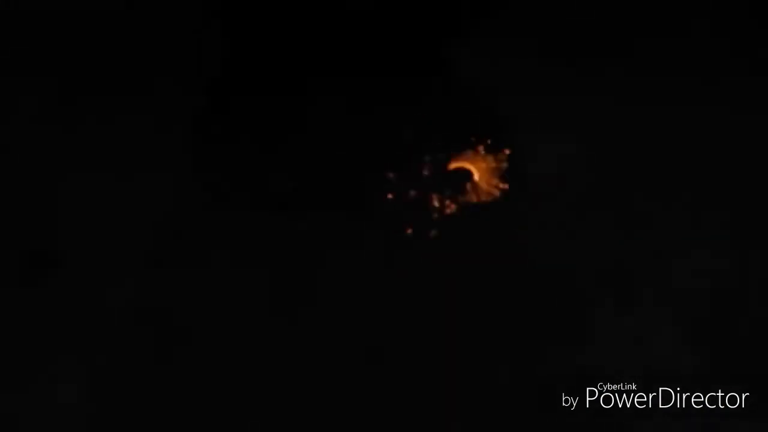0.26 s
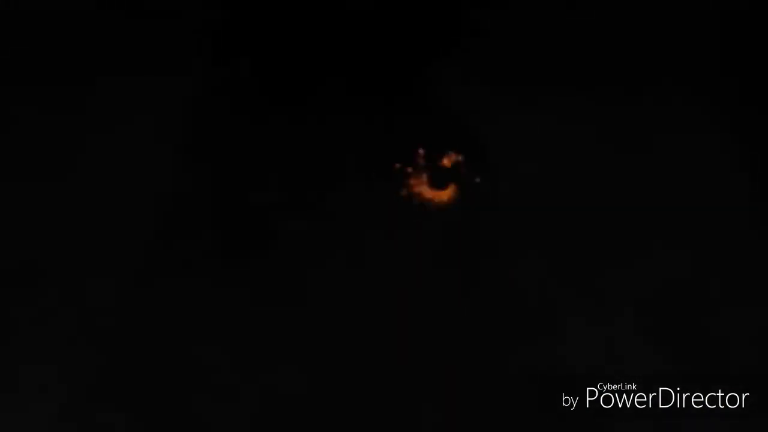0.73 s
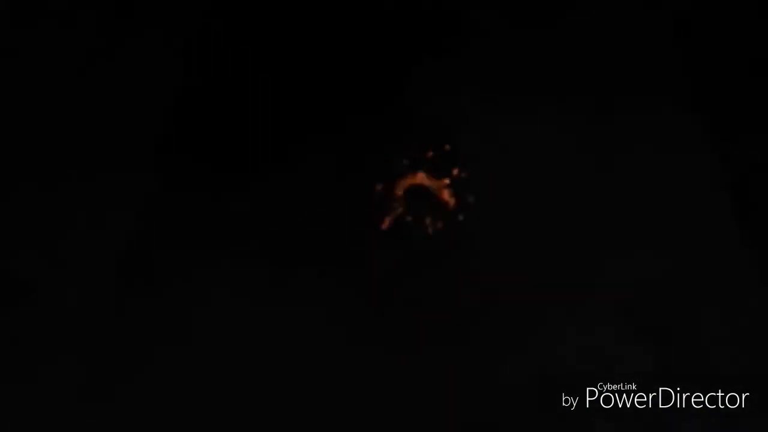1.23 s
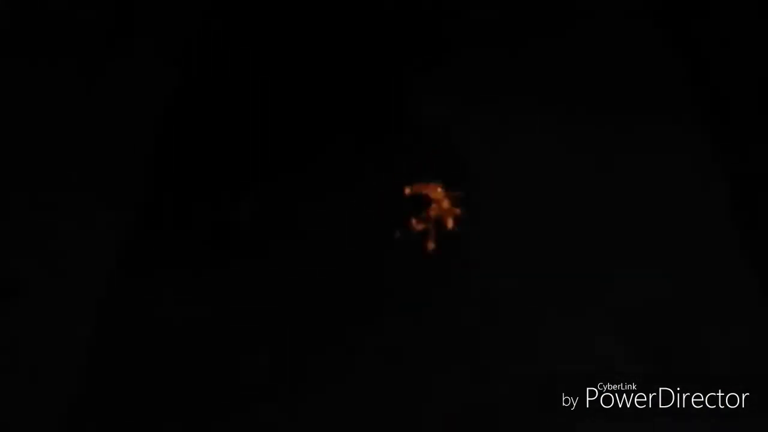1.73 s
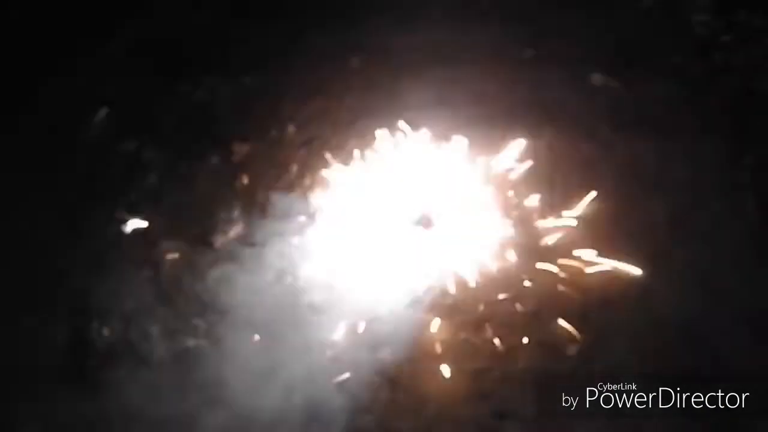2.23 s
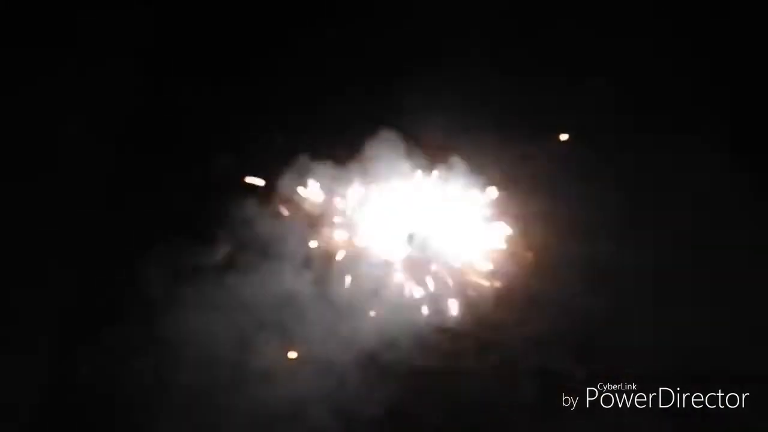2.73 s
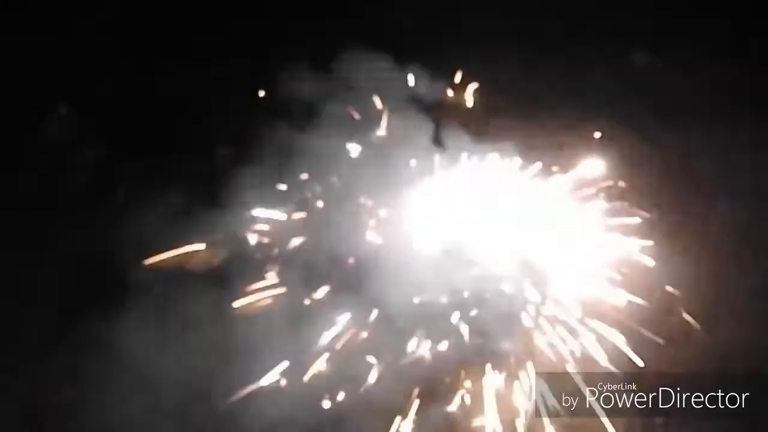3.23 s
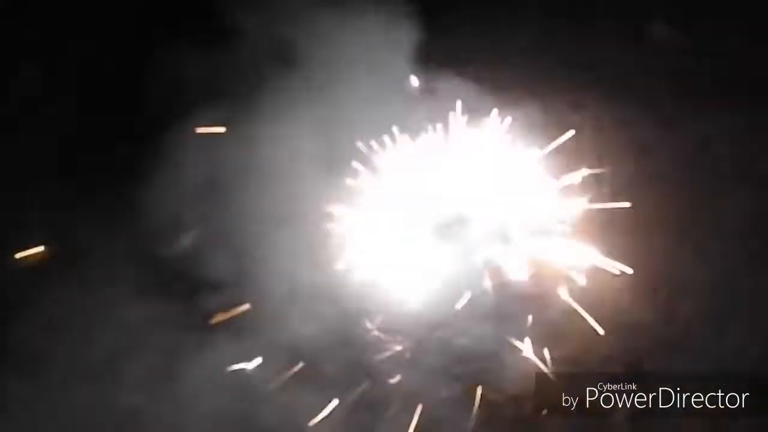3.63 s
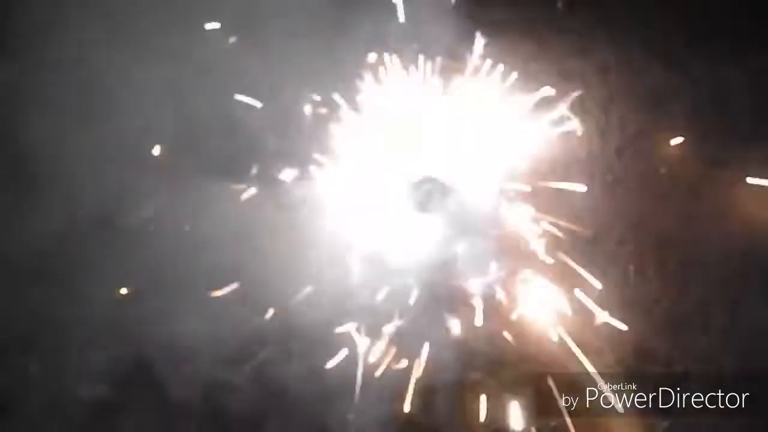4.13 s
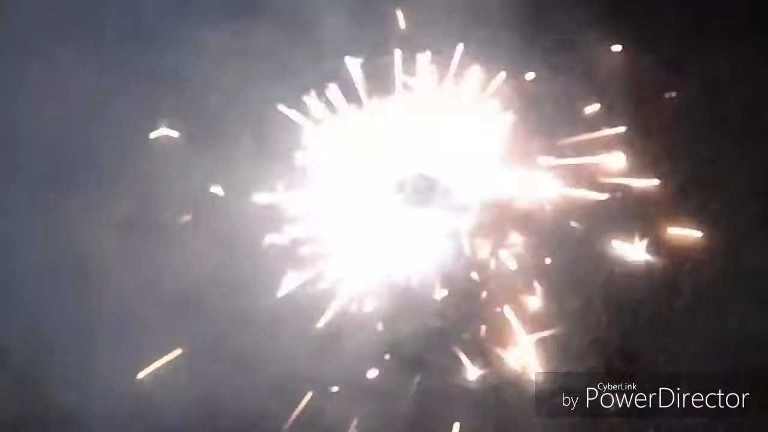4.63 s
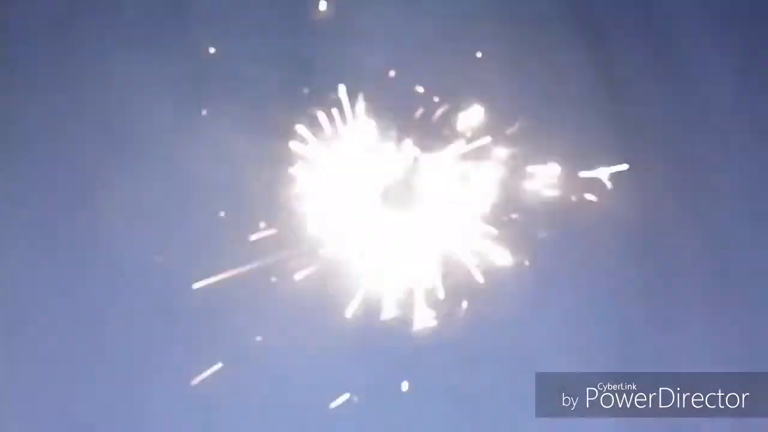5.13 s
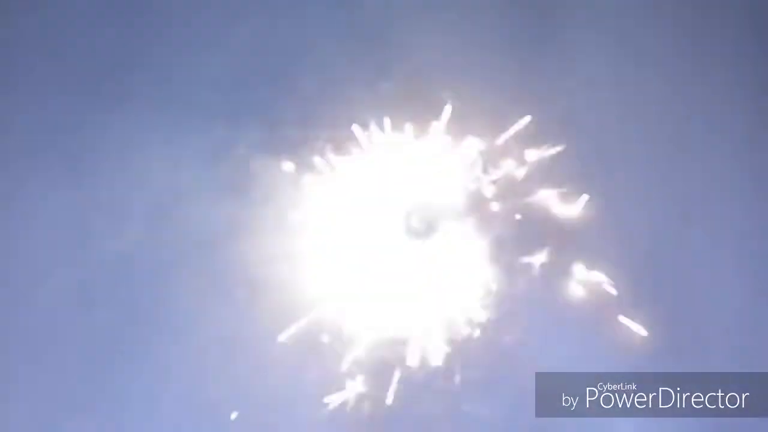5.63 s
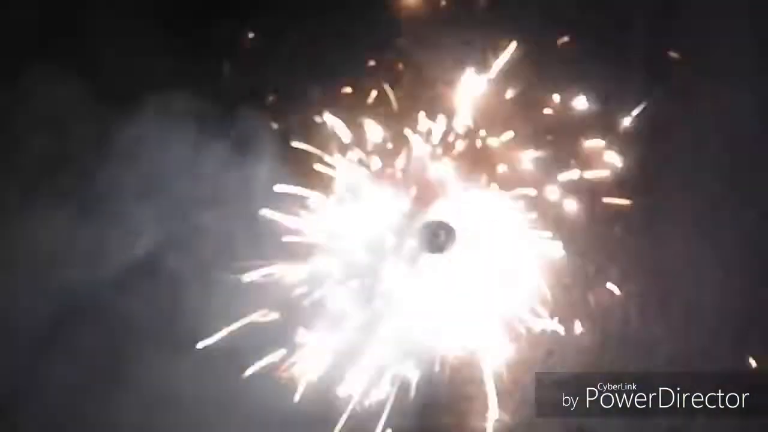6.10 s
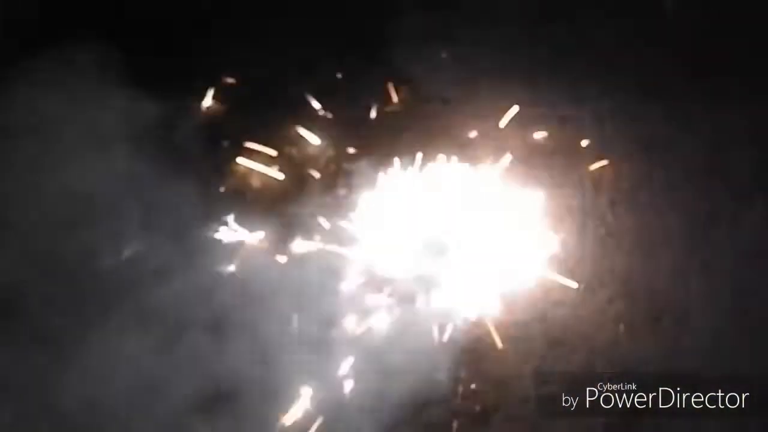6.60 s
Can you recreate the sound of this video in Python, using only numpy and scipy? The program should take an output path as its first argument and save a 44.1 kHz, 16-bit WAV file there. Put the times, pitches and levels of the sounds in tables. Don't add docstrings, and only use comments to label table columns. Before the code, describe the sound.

Outdoors at night, a small ground spinner fizzes quietly with tiny ticks, then bursts into a strong, throbbing, crackly hiss that keeps burning to the end.

```python
import sys
import numpy as np
from scipy import signal
from scipy.fft import rfft, irfft
from scipy.io import wavfile
from scipy.ndimage import uniform_filter1d

SR = 44100
rng = np.random.default_rng(int(sys.argv[2]) if len(sys.argv) > 2 else 0)


def master(y):
    cut = np.clip(np.atleast_2d(y).T, -1, 1)
    pcm = np.round(cut * 32767)
    wavfile.write(sys.argv[1], SR, pcm.astype(np.int16))


def attenuation_scalar(level_db):
    decades = np.asarray(level_db, float) / 20
    return 10 ** decades


N = 302393

# [f/Hz, density/dB per Hz]
NIGHT_COLOUR = [(12, -30), (20, -7), (33, -18), (60, -19), (203, -1), (400, -25), (520, -48), (880, -120)]
# [f/Hz, density/dB per Hz]
SIDE_COLOUR = [(25, 2), (200, 5.5), (800, -7), (2000, -21), (6000, -19), (10000, -7), (15500, -6.5)]
# [f/Hz, width/Hz, lift/dB]
YARD_BANDS = [(496, 85, 3.5), (756, 105, 2.5), (1110, 45, 0), (1590, 26, 1), (1910, 31, 3), (13900, 760, 4)]
# [t/s, then f/Hz of the four lowest notches]
HAND_NOTCHES = [(0, 2950, 6400, 10100, 13700), (1.66, 2950, 6450, 10150, 13800),
                (1.74, 2800, 6100, 9400, 12650), (3.1, 2760, 6000, 9300, 12500),
                (3.45, 2690, 5830, 9050, 12200), (3.9, 2730, 5900, 9250, 12400),
                (5.6, 2770, 6000, 9400, 12600), (5.74, 2800, 5800, 9400, 12400),
                (5.76, 2880, 5700, 9400, 10500), (5.84, 3080, 5500, 9800, 12600),
                (5.95, 3300, 5750, 10300, 13500), (6.04, 3250, 5700, 9700, 13300),
                (6.17, 3050, 5350, 8450, 11500), (6.33, 2620, 5020, 7250, 9700),
                (6.45, 2560, 4950, 7050, 9250), (6.65, 2600, 5000, 7050, 9200),
                (6.86, 2600, 5050, 7300, 9400)]
ECHO_STRENGTH = [(.66, .55, .45, .16, .2), (.82, .68, .55, .15, .22), (.62, .2, .38, .45, .2),
                 (.72, .18, .8, .5, .4), (.8, .28, .45, .4, .45)]
# [start t/s, end t/s]
FLARE_TIMES = (1.7, 3.0)
SWING_TIMES = (5.72, 5.86)
BACK_TIMES = (6.03, 6.12)
SETTLE_TIMES = (6.32, 6.42)
# [t/s, peak level/dB, f/Hz, ring/cycles, first swing up or down/+-1]
SPARK_BURSTS = [(.4180, -41, 1470, 5, 1), (.6140, -40, 2000, 2.8, 1), (.7689, -31, 2200, 3.6, 1),
                (.7690, -39, 5800, 6, 1), (.8016, -31, 1050, 1.9, -1), (.8016, -43, 400, 2.2, -1),
                (.8194, -40, 8400, 4, 1), (.8195, -36, 4500, 3.6, 1), (1.9530, -45, 5300, 2.6, 1),
                (6.0268, -22, 2400, 3.4, 1), (6.0268, -30, 600, 1.8, 1), (6.0268, -50, 75, 1.6, 1),
                (6.0269, -30, 14000, 8, 1), (6.02693, -9, 4300, 2.4, 1)]
# [t/s, turns done, hiss swing per turn/dB]
SPIN_COURSE = [(0, .51, .9), (.4, 5.77, 1.6), (1.0, 14.44, .9), (1.6, 22.02, .7), (2.0, 26.46, 3.0),
               (2.39, 30.55, .9), (2.59, 32.61, .9), (2.79, 34.5, 2.4), (2.99, 36.55, 2.2),
               (3.59, 43.89, 1.9), (4.39, 55.0, 1.5), (4.99, 63.54, 1.0), (5.19, 66.57, 1.0),
               (5.39, 69.42, 2.3), (6.19, 80.01, .8), (6.39, 82.99, .2), (6.59, 85.74, .5),
               (6.86, 90.2, .9)]
# [f/Hz, swing once a turn/dB, swing twice a turn/dB]
JET_LOBES = [(2600, .2, .2), (3300, .4, .3), (3950, 1.3, .3), (4650, 3.6, .8), (5350, 3.8, 1.7),
             (6050, 1.2, 2.2), (6750, .3, 2), (7500, 0, 1.1), (9000, 0, .9), (10300, 0, 1.1),
             (12000, 0, .6)]
# [f/Hz, density/dB per Hz]
JET_COLOUR = [(25, -24), (50, -25.5), (100, -8), (290, -7), (430, -4), (620, -7.5), (900, -4.5), (1800, 0),
              (2700, 4.5), (4000, 4), (6000, -7.5), (8000, -11.5), (10500, -14.5), (15500, -18.5)]
REGION_BORDERS = [140, 2800, 6000, 9300]
# [offset/dB, share of treble change, share of puffs]
REGION_FOLLOW = [
    (-31.5, -0.94, .2),
    (-5, -0.44, 0.81),
    (-7, -0.31, 0.92),
    (-12, 1.15, 1.62),
    (-16.5, 0.78, 0.69),
]
# [t/s, level/dB, treble share/dB, nozzle whistle over roar/dB]
SMOULDER_BURN = [
    (0, -54, -13, 0),
    (.25, -55.5, -11, -1.5),
    (.74, -53, -9.5, 3.5),
    (.82, -55.5, -12, -2),
    (.88, -63, -9, -0.5),
    (1.53, -58.5, -8.5, 2),
    (1.6, -65.5, -7, 2),
    (1.93, -60, -7.5, 1.5),
    (2.08, -60, -10, 3.5),
]
# [t/s, level/dB, treble share/dB, nozzle whistle over roar/dB]
FLARE_BURN = [(2.14, -57, -9, 4), (2.19, -51, -7, 0.5), (2.25, -42, -9, 1.5), (2.48, -35, -9.5, -4),
              (2.54, -40, -8, 1.5), (2.9, -40.5, -9, -0.5), (3.15, -40, -9, -3), (3.55, -38, -8, -2),
              (4.07, -36.5, -8.5, 2), (4.4, -36.5, -8.5, -1), (4.95, -38, -7.5, 1.5), (5.3, -38, -7.5, 0),
              (5.7, -36, -8.5, 0.5), (5.95, -35, -6, 2.5), (6.2, -37, -6, 2), (6.45, -35, -4, -1.5),
              (6.62, -38, -4, -3), (6.86, -38, -5, -3)]
# [t/s, extra level/dB, length/s]
GAS_PUFFS = [(0.08, 1.5, 0.074), (0.406, 3, 0.043), (0.526, 2.5, 0.054), (0.612, 1.5, 0.058),
             (.78, 4, 0.042), (0.962, -4, 0.039), (1.028, 3, 0.056), (1.19, -3.5, 0.042), (1.257, 1, .04),
             (1.65, 3, 0.04), (1.853, 2, 0.021), (1.935, 3, 0.022), (2.128, 2, 0.02), (3.42, 1.5, 0.017),
             (4.048, 1.5, 0.092), (4.23, -2.5, 0.02), (4.568, 4, 0.019), (4.602, 3, 0.064),
             (4.724, 4, 0.0073), (5.298, -1, 0.085), (5.425, 2.5, 0.056), (5.567, 2, 0.018),
             (5.695, 0.5, 0.047), (6.034, 2.5, 0.051), (6.093, 4.5, 0.034), (6.203, 4.5, 0.014),
             (6.348, 2, 0.037), (6.82, 1.5, 0.021)]
# [t/s, extra level/dB, length/s]
FINE_SPITS = [(.02, 4, .04), (.29, 4, .07), (.38, 4, .04), (.45, 4, .03), (.54, -1, .03), (1.64, 4, .05),
              (2.62, 5, .03), (5.1, 6, .02)]


def rms_one(x):
    return x / np.sqrt(np.mean(x ** 2) + 1e-20)


def in_time(rows):
    s, *columns = np.transpose(rows)
    return [np.interp(np.arange(N) / SR, s, c) for c in columns]


def drift(rate):
    r = np.exp(-80 * np.pi * rate / SR)
    slow = signal.lfilter([1], [1, -2 * r, r * r], rng.standard_normal(N // 40 + 2002))[2000:]
    return np.interp(np.arange(N) / 40, np.arange(len(slow)), rms_one(slow))


def coloured(x, points):
    hz = np.maximum(np.arange(N // 2 + 1) * SR / N, 1)
    point_hz, point_db = np.transpose(points)
    return rfft(x) * attenuation_scalar(np.interp(np.log(hz), np.log(point_hz), point_db)), hz


def coloured_noise(points):
    return rms_one(irfft(coloured(rng.standard_normal(N), points)[0], N))


def night_rumble():
    return attenuation_scalar(-86.5 + 2.0 * drift(2.8)) * coloured_noise(NIGHT_COLOUR)


def microphone_hiss():
    return attenuation_scalar(-85) * rng.standard_normal(N)


def channel_hiss():
    return attenuation_scalar(-81) * coloured_noise(SIDE_COLOUR)


def yard(x, scatter_db):
    response = np.zeros(N)
    lags = (rng.uniform(.002, .025, 40) * SR).astype(int)
    response[lags] = attenuation_scalar(scatter_db) * rng.standard_normal(40)
    hz = np.arange(N // 2 + 1) * SR / N
    lift_db = sum(db * np.exp(-.5 * ((hz - centre) / width) ** 2) for centre, width, db in YARD_BANDS)
    return irfft(rfft(x) * attenuation_scalar(lift_db) * (1 + rfft(response)), N)


def near_surface(x):
    tremor, echo_flicker = 0.01, 0.065
    hz, frames, spectra = signal.stft(x, SR, nperseg=512, noverlap=384)
    at = np.minimum(frames * SR, N - 1).astype(int)
    hand_s, *hand_hz = np.transpose(HAND_NOTCHES)
    notch = [np.interp(frames, hand_s, c) for c in hand_hz]
    fifth = 1.27 * notch[-1]
    notch = np.array(notch + [fifth]) * (1 + tremor * drift(25)[at])

    change_s = [*FLARE_TIMES, *SWING_TIMES, *BACK_TIMES, *SETTLE_TIMES]
    strength = []
    for dim, rest, swing, back, close in zip(*ECHO_STRENGTH):
        course = np.interp(frames, change_s, [dim, rest, rest, swing, swing, back, back, close])
        strength.append(course * (1 + echo_flicker * drift(23)[at]))
    strength = np.clip(np.transpose(strength), 0, .95)

    for k, (at_hz, share) in enumerate(zip(np.transpose(notch), strength)):
        far_hz = at_hz[4] + 10 * (at_hz[4] - at_hz[3])
        cycles = np.interp(hz, [0, *at_hz, far_hz], [.17, 1, 2, 3, 4, 5, 15])
        spectra[:, k] *= 1 - np.interp(hz, at_hz, share) * np.exp(-2j * np.pi * cycles)
    return signal.istft(spectra, SR, nperseg=512, noverlap=384)[1][:N]


def spark_bursts():
    out, t = np.zeros(N), np.arange(1500) / SR
    for s, peak_db, hz, cycles, sign in SPARK_BURSTS:
        swell = (t * hz) ** 2.1
        decay = np.exp(-np.log(1000) * t * hz / max(cycles, .5))
        pulse = np.sin(2 * np.pi * hz * t) * decay * swell
        at = round(s * SR)
        out[at:at + 1500] += sign * attenuation_scalar(peak_db) * pulse / np.abs(pulse).max()
    return out


def eddies(shape, depth_db):
    patches = uniform_filter1d(rng.standard_normal(shape), 3, axis=0)
    return depth_db * rms_one(uniform_filter1d(patches, 5, axis=1))


def spinning(x):
    hz, frames, spectra = signal.stft(x, SR, nperseg=256, noverlap=192)
    at = np.minimum(frames * SR, N - 1).astype(int)
    turns, swing_db = [c[at] for c in in_time(SPIN_COURSE)]
    once = (.45 + .35 * swing_db) * np.cos(2 * np.pi * turns)
    twice = 0.86 * np.cos(4 * np.pi * turns)
    lobe_hz, once_db, both_db = np.transpose(JET_LOBES)
    gain_db = np.outer(np.interp(hz, lobe_hz, once_db), once)
    gain_db = gain_db + np.outer(np.interp(hz, lobe_hz, both_db), twice)
    gain_db = gain_db + eddies(spectra.shape, depth_db=1.26)
    return signal.istft(spectra * attenuation_scalar(gain_db), SR, nperseg=256, noverlap=192)[1][:N]


def puffs(rows):
    t = np.arange(N) / SR
    total_db = 0
    for s, db, length in rows:
        rise = np.clip((t - s) / 0.002, 0, 1)
        fall = np.clip((s + length - t) / 0.002 + 1, 0, 1)
        total_db = total_db + db * rise * fall
    return total_db


def burning(crackles_per_s, spread_db, crackle_db):
    born = rng.random(N) < crackles_per_s * attenuation_scalar(3.0 * drift(15)) / SR
    sizes = attenuation_scalar(spread_db * np.minimum(rng.exponential(1, N), 4)) * rng.choice([-1, 1], N)
    return rng.standard_normal(N) + attenuation_scalar(crackle_db) * rms_one(born * sizes)


def jet():
    usual_treble_db, sharp_beam_db = -9, 1.5
    sizzle_swing_db, top_swing_db = 4.0, -.2
    hiss_share = 0.7
    loud_db, treble_db, whistle_db = in_time(SMOULDER_BURN + FLARE_BURN)
    turns, swing_db = in_time(SPIN_COURSE)
    facing = np.cos(2 * np.pi * turns)
    beamed = np.clip(swing_db - sharp_beam_db, 0, .5)
    sputter, puff_db = drift(20), puffs(GAS_PUFFS)

    rumble_db = 0.73 * sputter
    roar_db = 0.83 * sputter + 0.72 * drift(28) - (1 - hiss_share) * whistle_db
    hiss_db = 0.16 * sputter + .5 * drift(31) + hiss_share * whistle_db
    sizzle_db = sizzle_swing_db * beamed * facing + .5 * sputter + 1.73 * drift(49)
    top_db = top_swing_db * facing + .5 * sputter + 1.45 * drift(40) + puffs(FINE_SPITS)
    flicker_db = [rumble_db, roar_db, hiss_db, sizzle_db, top_db]

    spectrum, hz = coloured(burning(crackles_per_s=1500, spread_db=3.0, crackle_db=-12), JET_COLOUR)
    below = [0] + [1 / (1 + (hz / edge) ** 12) for edge in REGION_BORDERS] + [1]
    out = np.zeros(N)
    for k, (offset_db, bright, puffy) in enumerate(REGION_FOLLOW):
        region = rms_one(irfft(spectrum * (below[k + 1] - below[k]), N))
        level_db = loud_db + offset_db + bright * (treble_db - usual_treble_db)
        level_db = level_db + puffy * puff_db + flicker_db[k]
        out += attenuation_scalar(level_db) * region
    return out


def scene():
    heard = near_surface(yard(spinning(jet()), scatter_db=-35))
    mid = heard + spark_bursts() + night_rumble() + microphone_hiss()
    side = channel_hiss()
    return np.array([mid + side, mid - side])


def top_cut(x):
    return signal.sosfilt(signal.butter(12, 16030, fs=SR, output="sos"), x)


def record(dry):
    hz = np.arange(N // 2 + 1) * SR / N
    cut = irfft(rfft(dry) * (hz < 15480), N)
    return top_cut(cut - 0.0003)


dry = scene()
out = record(dry)
master(out)
```